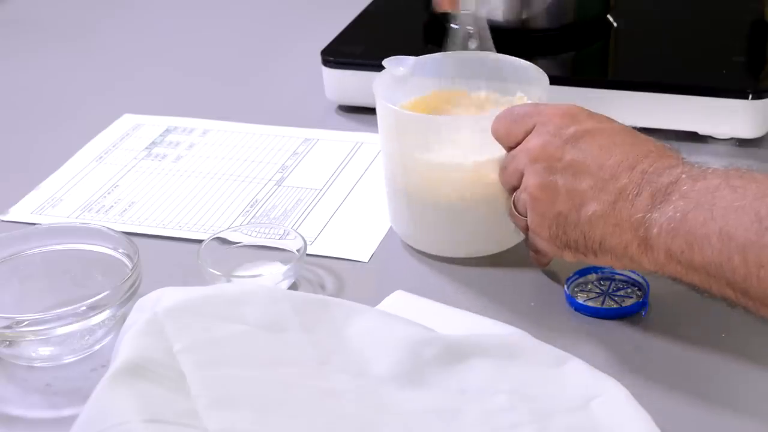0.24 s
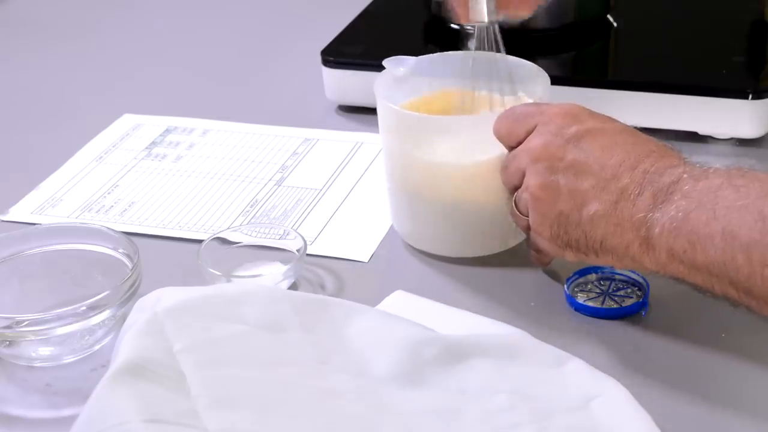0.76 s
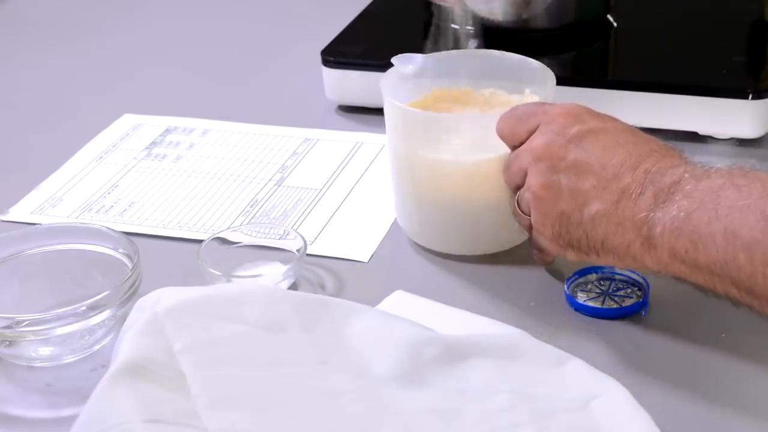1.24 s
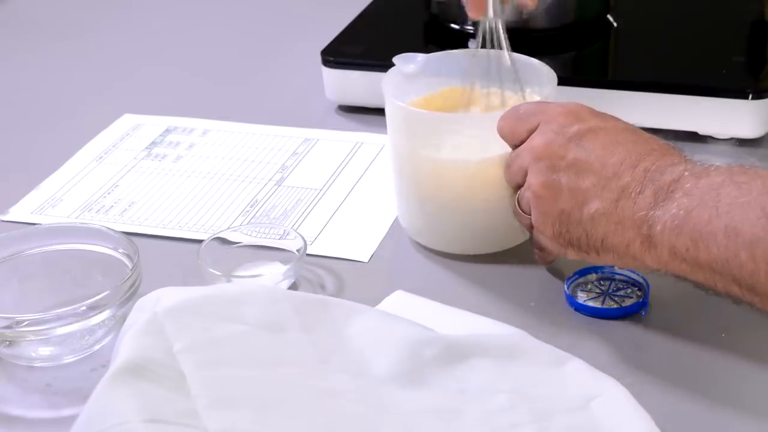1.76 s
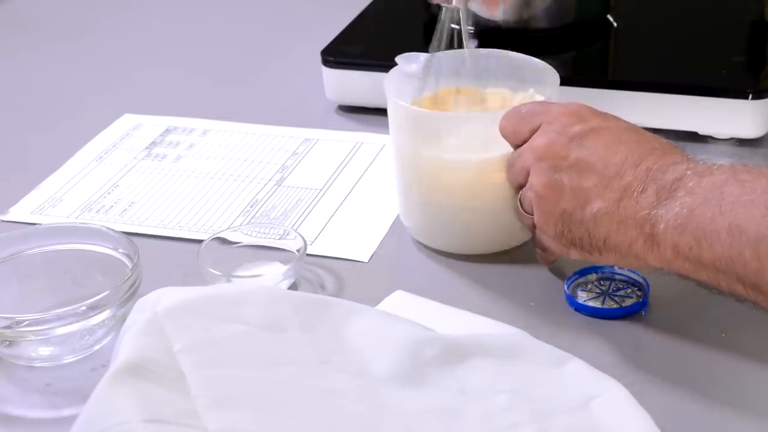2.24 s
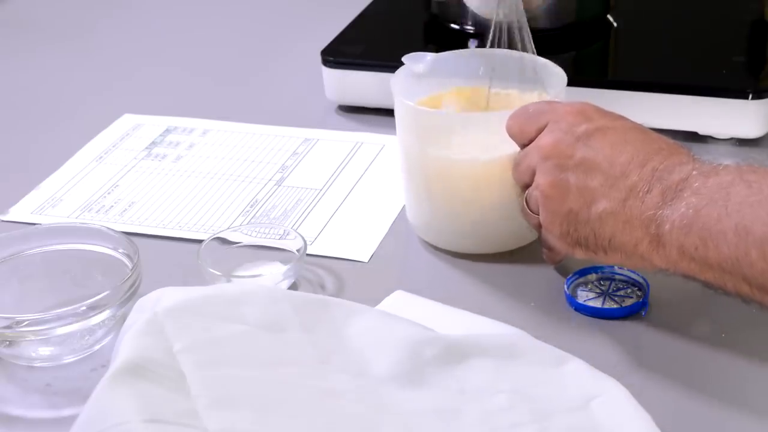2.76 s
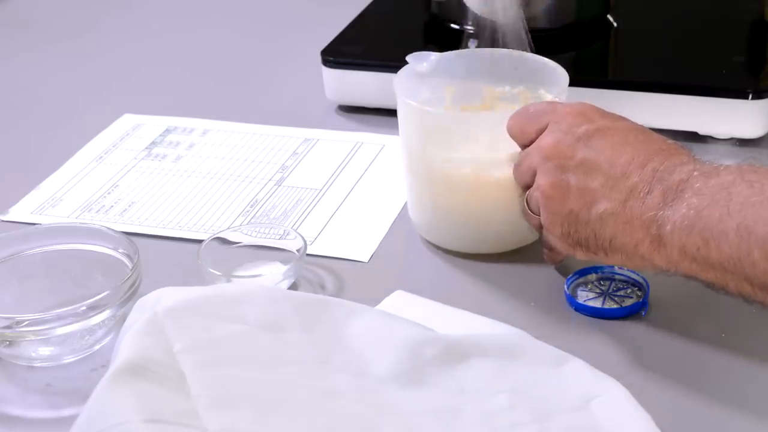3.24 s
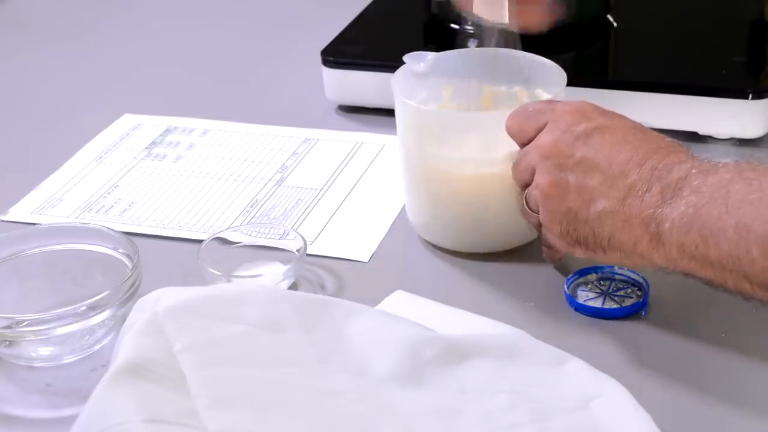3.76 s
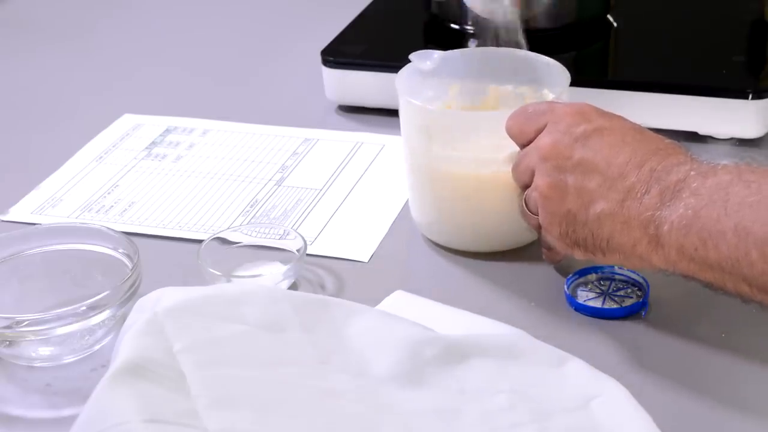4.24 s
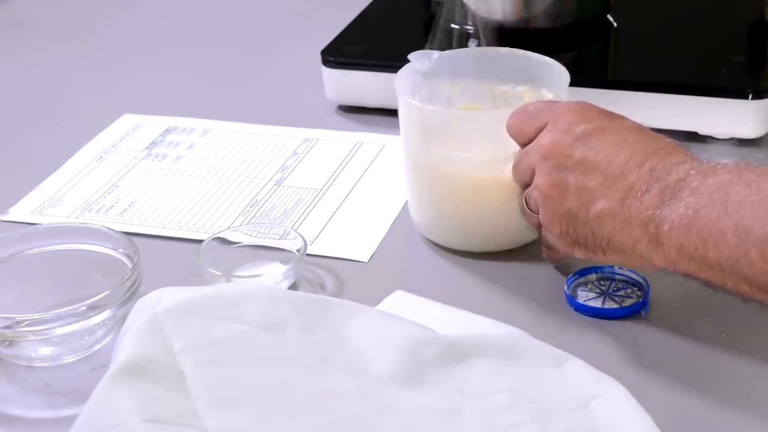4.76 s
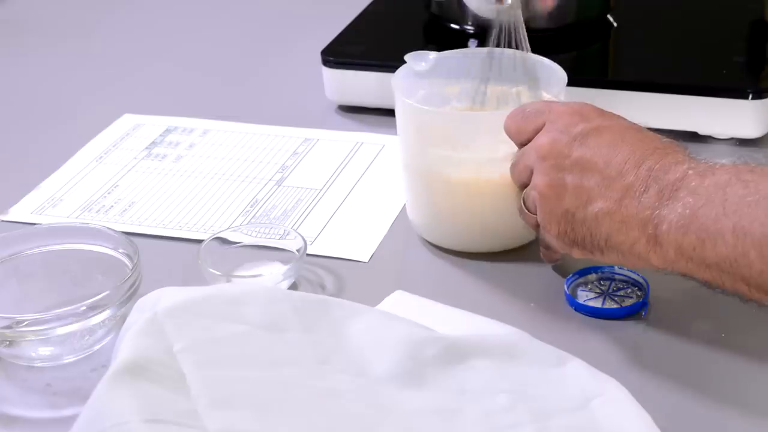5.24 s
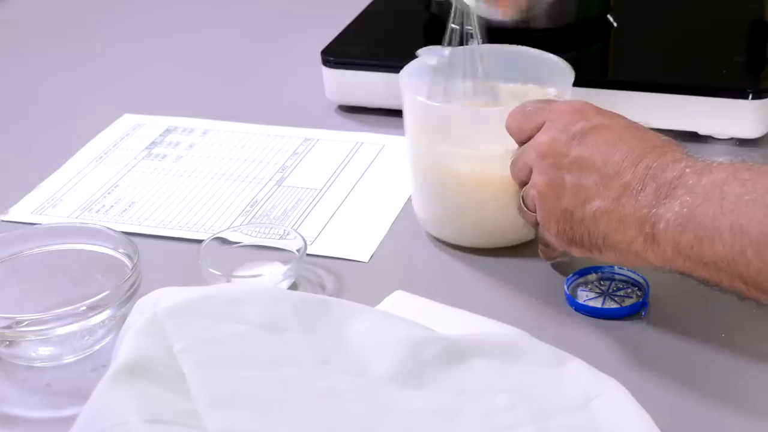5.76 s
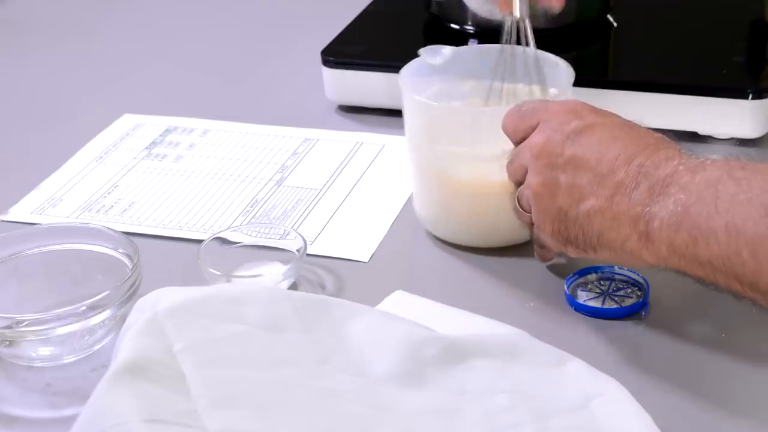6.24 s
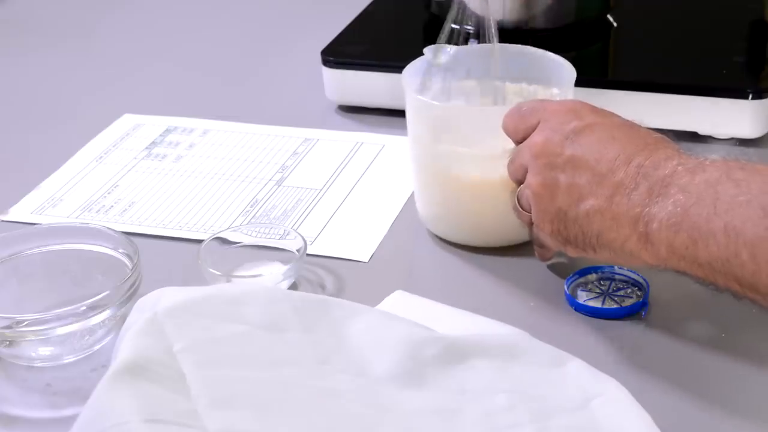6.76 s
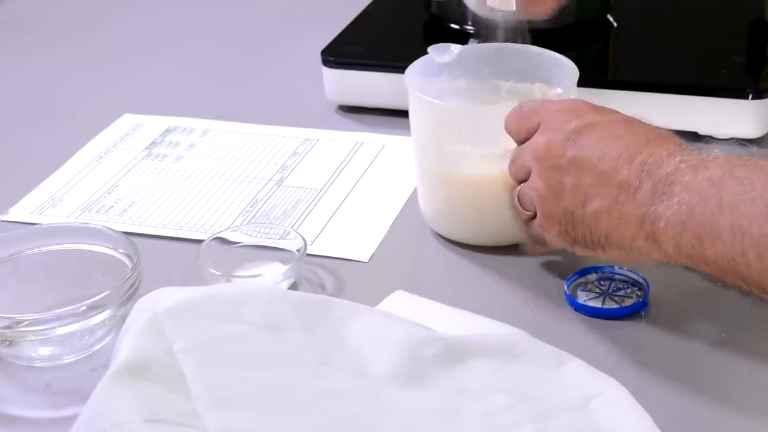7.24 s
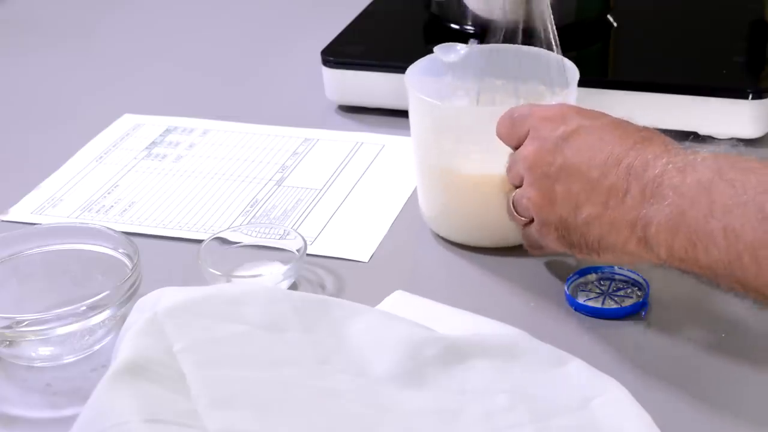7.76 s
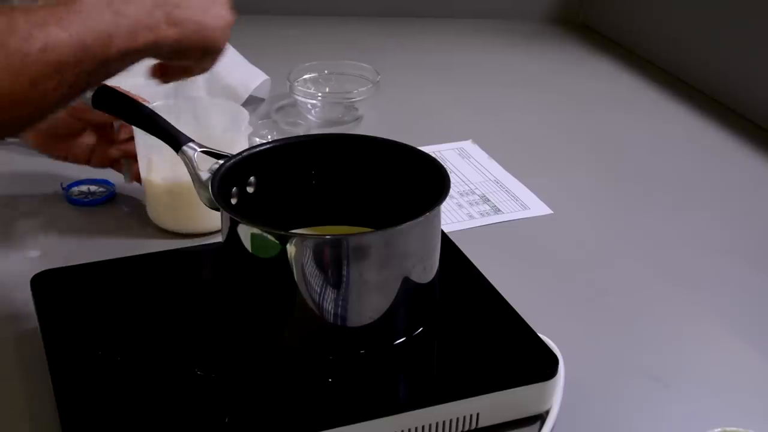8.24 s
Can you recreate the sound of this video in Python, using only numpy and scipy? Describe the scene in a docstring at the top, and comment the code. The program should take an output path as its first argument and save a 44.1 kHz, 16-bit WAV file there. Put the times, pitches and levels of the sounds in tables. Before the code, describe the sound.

A wire whisk beats batter in a plastic jug, close to the microphone, starting almost at once and running at about five strokes a second. Each stroke is an uneven cluster of bright ticks as the wires hit the wall, with a short, hollow plastic ring. Between strokes the wires scrape lightly and sometimes snap together, while the batter gives a fine wet hiss, tiny pops, occasional soft gulps and a faint low slop. Harder hits come around 2 seconds. From about 2.9 to 3.4 seconds the beating drops to a few light taps, then resumes strongly. It sounds a little duller near 4.6 seconds and brighter from 5.5, with sharper wire snaps around 6 seconds. The jug bumps softly on the counter now and then, mostly in the second half. Whisking continues until about 8.5 seconds, with a short kitchen echo and quiet room tone behind it.

```python
"""Whisking batter in a plastic jug

A kitchen counter, one microphone close to the jug; a wire whisk beats about five strokes a second.
At each contact the wires meet the wall one after another, a volley of ticks that rings the jug's modes.
In between they drag along the wall and snap together, and the batter sprays, pops, gulps and slops.
Now and then the jug knocks on the counter. Behind it all, a short kitchen echo and quiet room tone."""
import sys
import numpy as np
from scipy import signal
from scipy.fft import rfft, irfft
from scipy.io import wavfile
from scipy.ndimage import uniform_filter1d

SR = 44100
rng = np.random.default_rng(int(sys.argv[2]) if len(sys.argv) > 2 else 0)


def materialize(psi):
    """Save the field psi as 16-bit PCM at rate SR to the path in sys.argv[1].

    A 1-D psi becomes a single channel; in a 2-D psi each row is a channel.
    """
    bounded = np.clip(np.atleast_2d(psi).T, -1, 1)
    quanta = np.round(bounded * 32767).astype(np.int16)
    wavfile.write(sys.argv[1], SR, quanta)


N = 374453

# whisk on wall: (time [s], level [dB], low modes [dB], 1 kHz modes [dB], volley length [ms])
CONTACTS = [(0.17,-55,22,-20,9.8),(0.218,-34.5,5,-9,13.1),(0.239,-26,-5,-6,8.7),(0.357,-43,-11,-5,9.5),(0.404,-33.5,1,3.5,8.8),
            (0.418,-35.5,-5,-5,39),(0.465,-35.5,-1,-6,15.4),(0.487,-33,4,3,7.7),(0.535,-38,-12,7.5,11),(.609,-39,16,-14,9.4),
            (.623,-32.5,7,-9,13.7),(.676,-44,7.5,0,26),(0.697,-43.5,-9,9,12),(.724,-32.5,-27,9.5,9.9),(.798,-47,-1,0,14.6),(.822,-29.5,-0.5,-1,17.2),(0.839,-33,-16,-23,9.2),
            (.871,-38.5,2,2,18.5),(.91,-42.5,-4,3.5,27),(0.987,-43.5,5,5,13),(1.005,-30.5,7,-6,9.3),
            (1.023,-37.5,-13,-21,21),(1.061,-39.5,-1,7,15.8),(1.094,-42,-2,6,11.7),(1.131,-39,-26,7,9.4),(1.157,-42,-15,-5,10.4),(1.206,-29.5,-13,-6,10.9),
            (1.257,-38.5,-3,0,14.8),(1.293,-41,-10,7,8.9),(1.306,-36,-5,8,8),(1.407,-36.5,4,-3,7.1),(1.459,-38.5,-1,0,13.3),
            (1.548,-41.5,-5,0,11.2),(1.593,-41,10.5,-4,11.2),(1.607,-39.5,-12,-18,9.3),(1.663,-32.5,-13,0,9.6),(1.694,-38,1,1.5,28.7),
            (1.801,-24.5,1,3.5,5.7),(1.809,-26.5,-6,0.5,19.3),(1.902,-37.5,-2.5,2.5,14.3),(1.934,-41.5,-9,-5,9.9),(1.977,-25,3,-5,13.9),
            (1.992,-24,-4,-7,14),(2.037,-36.5,-1,10.5,15),(2.067,-30,-20,7,6.4),(2.122,-42.5,-15,10,9.4),(2.172,-30.5,11,-17,2.7),
            (2.18,-22.5,-2.5,-12,18.4),(2.235,-44,-11,1,21),(2.257,-35,5,-2,7),(2.268,-30.5,-9,7,7.4),(2.307,-43.5,-11,4,18),
            (2.378,-20.5,-5.5,-8,16.7),(2.425,-34.5,-6,-1,23),(2.457,-36,-7,-1,16),(2.467,-39,5,-1,14),(2.517,-38.5,-9,5,13.7),
            (2.549,-40,-11,2,5.3),(2.585,-31,4,-3,12.3),(2.636,-36,-4,1,15.8),(2.711,-42,2,-5,11.4),(2.805,-31,1,-2.5,4.5),(2.812,-31.5,-9,2,4.35),(2.853,-44.5,-6,-8,10),
            (3.02,-44,7,-1,14.8),(3.234,-39,7.5,-2,11),(3.292,-46.5,-3,6,11.6),(3.439,-23,0,-4,7.05),(3.467,-38,-17,5,6),
            (3.493,-40.5,-6,4,11.6),(3.552,-44,-11,11,10.5),(3.601,-47.5,1,8,5.4),(3.635,-21,-3,-5.5,8.6),(3.675,-35.5,-12,-4,20.4),
            (3.714,-35.5,-10,12,11.7),(3.761,-41.5,-9,6,12),(3.82,-38.5,23,5,7.8),(3.829,-25.5,-11,-13,15.3),(3.841,-27,-29,7,11),(3.882,-34.5,-9,-5,14),
            (3.915,-34.5,-8,5,20.7),(3.959,-35,-36,15.5,8.5),(4.024,-22.5,0.5,-8,10.2),(4.035,-25,-11,-4,7.1),(4.078,-31,-8,3,6.3),
            (4.117,-40.5,-26,12,18),(4.162,-38,-25,16.5,9.3),(4.228,-27,-3.5,-3,15),(4.278,-41,4,-4,17),(4.316,-41,-2,8,14),
            (4.432,-28,2.5,-5,17.4),(4.48,-36.5,-1,-6,5.8),(4.497,-39.5,-6,-4,11),(4.646,-26.5,-0.5,-2.5,10.1),(4.687,-39,-21,-11,7.3),(4.869,-25.5,-1,-4,6.8),
            (4.878,-30.5,1,5.5,8.8),(4.979,-38.5,10,-1,21.2),(5.068,-31,-5,4,11.2),(5.123,-42.5,7.5,5,28),(5.151,-38,-6,5,8.7),
            (5.21,-41,-5,3,8.7),(5.278,-31,0,2,10.2),(5.312,-33.5,-17,2,20),(5.345,-38,4,-4,10.5),(5.355,-41.5,-22,12.5,9),(5.414,-36.5,2,3.5,18),
            (5.471,-33.5,-0.5,-3,13.8),(5.502,-33.5,-7,3.5,12.7),(5.529,-39,2,6.5,9.8),(5.548,-37.5,-22,12,10.6),(5.613,-34,-25,10.5,25),
            (5.671,-31,0,7,14.9),(5.704,-36,7.5,-5,20),(5.752,-38,-12,14.5,21.5),(5.805,-38,-13,10,15),(5.823,-42.5,-9,17,11.2),
            (5.86,-27,-0.5,-4,16),(5.915,-37,-1,8,12.2),(5.953,-37,-23,16,16),(6,-37,1,7,8.7),(6.063,-23.5,-4,-4,11.5),
            (6.113,-30.5,-1,-2,9.7),(6.136,-40.5,-3,13.5,12.8),(6.15,-31,-31,14,12),(6.196,-35,-1,6,12),(6.262,-27.5,2,-3.5,18.5),
            (6.352,-35,-8,11,9.6),(6.382,-39,-8,9,7),(6.403,-35,2,7.5,9.2),(6.472,-24.5,0,-11,16.9),(6.527,-35,-8,-4,10),
            (6.566,-30.5,-9,1.5,17.2),(6.612,-33.5,0,-4,11.2),(6.68,-24.5,-5,1.5,7.5),(6.688,-26.5,-6,-19,6.7),(6.718,-36.5,-6,-2,43),
            (6.769,-39.5,6,2,15),(6.815,-38.5,0,-1,13),(6.872,-31.5,-1,-16,7.8),(6.878,-25,2,6.5,4.5),(6.884,-32,3.5,2,9.3),(6.974,-37,2,4,18.2),(7.024,-42.5,4,3,14.6),
            (7.096,-22.5,2,8,4.93),(7.102,-34,4,4,11.2),(7.149,-39.5,-7,-7,10),(7.174,-41.5,-1,9,7.3),(7.242,-42.5,-6,7,14),(7.302,-43,4.5,10,8.3),(7.31,-35.5,3.5,9,13.4),
            (7.343,-41.5,-8,15,4.5),(7.353,-38,1,7,12),(7.391,-39.5,-2,6,12),(7.452,-38.5,6.5,6.5,9.5),(7.517,-46.5,13.5,-4,21),(7.63,-36,7.5,11.5,12.2),(7.666,-43,11,-5,21),
            (7.732,-43,10,4.5,32.3),(7.857,-44,14,6,19.5),(7.91,-34.5,0,5,11.6),(7.975,-44,-5,-11,6.6),(7.986,-26.5,-0.5,4.5,4.8),(7.994,-33,-1,9.5,10.4),
            (8.05,-44.5,-10,-5,12.2),(8.232,-36.5,5,8,14.1),(8.279,-45.5,0,7,22.7),(8.382,-39.5,2,7.5,19.7),(8.45,-25,4.5,-1,3.87),(8.458,-31.5,0,5,8.3)]
# resonances of jug and wires: (frequency [Hz], level [dB], t60 [s])
JUG_MODES = [(348.5, -37.5, 0.061), (425.6, -38, 0.08), (517, -49, 0.14), (639.7, -36, 0.039),
             (782.6, -34.5, 0.036), (930.6, -27.5, 0.045), (1068.5, -29, 0.044), (1236, -33.5, 0.052),
             (1322, -29, 0.018), (1688, -46, 0.18), (1949, -24.5, 0.019), (2171, -26.5, 0.038),
             (2234, -35.5, 0.077), (2497, -31, 0.025), (2965, -20.5, 0.009), (2790, -21.5, 0.0088),
             (3170, -27.5, 0.027), (3375, -22.5, 0.018), (3700, -19.5, 0.005), (4300, -23, 0.0024),
             (4395, -22, 0.014), (4710, -21, 0.0083), (5340, -17, 0.0061), (6610, -28, 0.013),
             (7980, -28.5, 0.0088), (9330, -30, 0.0054)]
# anchors of the low, 1 kHz, middle (two ends) and high modes: (frequency [Hz])
ZONES_HZ = [600, 1305, 2340, 2970, 3740]
# strength of the contacts' high modes and ticks: (time [s], level [dB])
BRIGHTNESS = [(0, 0.5), (1.5, -1.5), (2.4, -2.5), (3, -4), (4, -3.5), (4.6, -8), (5.5, 0), (6.5, -2),
              (7.3, 0.5), (8.49, 3.5)]
# tick of wire on plastic: (frequency [Hz], level [dB])
TICK_SPECTRUM = [(300, -48), (1500, -16), (3500, -6), (6000, -2.5), (9000, -4), (16500, -19.5)]
# wires dragging and air pockets popping: (time [s], level [dB])
STIR_LEVEL = [(0.0, -103), (0.23, -54.5), (0.42, -54), (1.04, -51.5), (1.61, -57.5), (1.89, -52),
              (2.43, -55.5), (2.98, -62), (3.26, -61.5), (3.9, -52), (4.73, -62), (5.7, -53), (6.29, -53.5),
              (7.76, -57.5), (8.49, -60)]
# wire against wire: (time [s], level [dB])
WIRE_SNAPS = [(0.4645, -23), (0.5345, -29.5), (0.592, -31), (0.798, -42), (1.1802, -30), (1.461, -23.5),
              (1.525, -37), (2.235, -23), (2.961, -35.5), (3.292, -25), (3.8812, -25), (3.897, -23),
              (4.117, -31), (4.28, -27), (4.302, -33), (4.357, -36), (5.4214, -26), (5.504, -17),
              (5.916, -18.5), (5.938, -30), (6.112, -16), (6.3165, -24), (6.34, -29), (6.9504, -32.5),
              (7.0068, -35), (7.118, -28), (7.1507, -28.5), (7.7047, -31), (8.2851, -36)]
# air gulped by the batter: (time [s], level [dB], pitch [Hz])
GLUGS = [(0.633, -40, 343), (1.002, -34, 601), (1.024, -39, 330), (1.205, -40, 440), (1.985, -37.5, 357),
         (3.023, -46.5, 407), (3.236, -41, 418), (3.83, -35, 600), (3.845, -47, 362), (4.03, -39, 351),
         (5.149, -39.5, 502), (5.717, -35, 332), (5.862, -38, 630), (5.954, -30, 1302), (6.148, -33, 1280),
         (7.456, -35.5, 920)]
# jug on counter: (time [s], level [dB], pitch [Hz])
KNOCKS = [(1.99, -48, 241), (3.823, -51, 232), (4.02, -55, 149), (4.872, -47, 245), (4.988, -51, 174),
          (5.151, -52, 163), (5.427, -46, 260), (7.091, -43.5, 260), (7.642, -50, 242), (7.89, -48, 176)]
# batter slopping: (time [s], level [dB])
SLOP_LEVEL = [(0, -65.5), (4.3, -65), (5, -63.5), (8.49, -59)]
# decay of the kitchen's echo: (frequency [Hz], t60 [s])
KITCHEN_DECAY = [(700, 0.57), (4000, 0.16), (12000, 0.11)]
# room tone: (frequency [Hz], level [dB])
ROOM_SPECTRUM = [(20, -16), (130, -13.5), (500, -7), (2500, -18), (16500, -33)]


def whisk_contacts(wires=10, chatters=8, square_ms=9.1, lead_in=0.27, wire_scatter_db=1.83):
    """Each contact is a volley: wires land one by one, each chattering briefly; the last trail off."""
    start_s, level_db, low_db, khz_db, volley_ms = np.transpose(CONTACTS)[:, :, None]
    high_db = np.interp(start_s, *np.transpose(BRIGHTNESS))
    volleys, length = len(CONTACTS), volley_ms * SR / 1000
    lands = (np.arange(wires) + rng.random((volleys, wires))) / (wires - 3)   # in volley lengths
    lands[:, 0] = 0
    lands += 4.5 * np.maximum(lands - 1, 0)   # three stragglers rattle on after the volley
    late = np.repeat(lands, chatters, axis=1) + .12 * rng.random((volleys, wires * chatters)) ** 2
    at = (start_s * SR + late * length).astype(int)
    force_db = wire_scatter_db * np.repeat(rng.standard_normal((volleys, wires)), chatters, axis=1)
    chatter = np.clip(rng.standard_normal(late.shape), -2, 2)
    # short volleys land at full force; longer, glancing ones swell
    swell = np.minimum(square_ms / volley_ms + late / lead_in / 2, 1)
    fade = from_db(np.maximum(-7 * late ** 2, -27))
    sizes = swell * fade * from_db(force_db) * chatter
    # the energy of a volley is its power times its length
    sizes *= from_db(level_db) * np.sqrt(length / np.sum(sizes ** 2, axis=1, keepdims=True))
    scatter = np.clip(rng.standard_normal((volleys, 1, len(JUG_MODES))), -2, 1)
    signs = rng.choice([-1, 1], late.shape + (len(JUG_MODES),))
    bends = rng.integers(-2, 3, scatter.shape)
    body = jug(at, sizes, (low_db, khz_db, high_db), scatter, signs, bends)
    return body + wire_ticks(at, sizes * from_db(high_db) * (late < 1.3))


def jug(at, sizes, zone_db, scatter, signs, bends, scatter_db=3.5, load_bend=0.019, build_up_s=0.00786):
    """Ticks ring every mode of the jug; each contact point favours other modes, pushed in or out."""
    out = np.zeros(N)
    for k, (hz, mode_db, t60) in enumerate(JUG_MODES):
        # weights of the low, 1 kHz and high zones
        weights = [np.interp(np.log(hz), np.log(ZONES_HZ), row) for row in np.eye(5)[[0, 1, 4]]]
        tilt_db = sum(weight * db for weight, db in zip(weights, zone_db))
        gain = sizes * signs[..., k] * from_db(mode_db + tilt_db + scatter_db * scatter[..., k])
        # slow bending waves set the lowest mode going late, higher ones much sooner
        lag = int(build_up_s * SR * (JUG_MODES[0][0] / hz) ** 2)
        for bend in range(-2, 3):   # the batter's load bends the pitch up to two steps either way
            clicks = sum_at(at + lag, gain * (bends[..., k] == bend))
            out += ring(clicks, hz * (1 + load_bend * bend), t60)
    return out


def wire_ticks(at, sizes, split_hz=6500, tilt_db=5):
    """The bare tick of wire on plastic before any mode builds up, brighter or duller at each contact."""
    tilt = from_db(tilt_db * rng.standard_normal((len(at), 1)))
    lows = butter(sum_at(at, sizes) + 1e-18, split_hz, "low")
    highs = butter(sum_at(at, sizes * tilt) + 1e-18, split_hz, "high")
    return colour(lows + highs, TICK_SPECTRUM)


def wire_drag(catches_per_s=2500):
    """Dense, uneven little catches of the wires on the wall ring the same modes."""
    at = np.flatnonzero(rng.random(N) < catches_per_s / SR)
    sizes = from_db(3 * np.minimum(rng.exponential(1, N), 5))[at]
    patch, modes = at // 512, len(JUG_MODES)   # mode balance and pitch hold for about 12 ms
    scatter = rng.standard_normal((2048, modes))[patch]
    signs = rng.choice([-1, 1], (4096, modes))[at % 4096]
    bends = rng.integers(-2, 3, (2048, modes))[patch]
    return rms_one(jug(at, sizes, zone_db=(9, -5, 0), scatter=scatter, signs=signs, bends=bends))


def wire_snaps(crack_t60_s=0.007, tail_t60_s=0.069, above_hz=570):
    """Wires snap against each other: a bright burst that cracks at once, then dies fast."""
    out, t = np.zeros(N), np.arange(SR // 16) / SR
    decay = from_db(-60 * t / crack_t60_s) + from_db(-60 * t / tail_t60_s) / 3
    for start_s, level_db in WIRE_SNAPS:
        start = int(start_s * SR)
        out[start:start + len(t)] += from_db(level_db) * decay * rng.standard_normal(len(t))
    return colour(butter(out, above_hz, "high"), TICK_SPECTRUM)


def batter_spray(contact, t60_s=0.091, above_hz=2300, shimmer_db=-22):
    """Batter sprays through the wires after each contact: a fluttering hiss with a thin wire shimmer."""
    keep = from_db(-120 / (t60_s * SR))
    envelope = np.sqrt(signal.lfilter([1 - keep], [1, -keep], contact ** 2))
    flutter = from_db(3 * rms_one(uniform_filter1d(rng.standard_normal(N), size=400)))
    noise = rng.standard_normal(N)
    hiss = rms_one(colour(butter(noise, above_hz, "high"), TICK_SPECTRUM))
    shimmer = from_db(shimmer_db) * rms_one(ring(noise, hz=12610, t60=0.03))
    return envelope * flutter * (hiss + shimmer)


def batter_pops(pops_per_s=1500, lowest_hz=1800, cycles=0.76, tilt_db=-9, spread=0.32):
    """Small air pockets burst in clumps, each clump near a pitch of its own, fainter on top."""
    clump = 400   # samples
    density = np.repeat(rng.exponential(1, N // clump + 1), clump)[:N]
    at = np.flatnonzero(rng.random(N) < density * pops_per_s / SR)
    own_pitch, faintness = rng.random((2, N))[:, at, None]
    clump_pitch = rng.random(N // clump + 1)[at // clump, None]
    pitch = spread * own_pitch + (1 - spread) * clump_pitch
    hz = lowest_hz * 8 ** pitch   # within three octaves
    t = np.arange(256) / SR
    age = t * hz / cycles
    tones = from_db(tilt_db * pitch - 20 * faintness - 10 * age) * np.sin(2 * np.pi * hz * t)
    return rms_one(sum_at(at[:, None] + np.arange(len(t)), tones))


def glugs_and_knocks(glug_crest_s=0.0075, knock_crest_s=0.0076, rise_per_s=1.3):
    """Batter gulps air and the jug knocks on the counter: soft tones that swell, climb a little and die."""
    out, t = np.zeros(N), np.arange(SR // 8) / SR
    for events, crest_s in ((GLUGS, glug_crest_s), (KNOCKS, knock_crest_s)):
        swell = t / crest_s * np.exp(1 - t / crest_s)
        for start_s, level_db, hz in events:
            start = int(start_s * SR)
            tone = np.sin(2 * np.pi * hz * t * (1 + rise_per_s * t / 2))
            out[start:start + len(t)] += from_db(level_db) * swell * tone
    return out


def batter_slop(band_hz=(95, 240)):
    """Low lumpy noise of thick batter thrown about."""
    return from_db(in_time(SLOP_LEVEL)) * rms_one(butter(rng.standard_normal(N), band_hz, "band"))


def kitchen_echo(source, count=8, hold_samples=2000, onset_s=0.0027):
    """Diffuse tails, each octave dying at its own rate; they take turns as the contact point wanders."""
    t, tails = np.arange(SR // 2) / SR, 0
    for hz in 177 * 2. ** np.arange(7):
        octave = butter(rng.standard_normal((count, len(t))), [hz / np.sqrt(2), hz * np.sqrt(2)], "band")
        tails = tails + octave * from_db(-60 * t / at_hz(KITCHEN_DECAY, hz))
    tails *= np.clip(t / onset_s, 0, 1)
    tails /= np.sqrt(np.sum(tails ** 2, axis=1, keepdims=True))
    turn = np.arange(N) // hold_samples % count == np.arange(count)[:, None]
    shares = uniform_filter1d(turn * 1., size=hold_samples // 4, axis=1)
    return signal.fftconvolve(source * shares, tails, axes=1).sum(axis=0)[:N]


def room_tone(air_db=-64, rumble_db=-71.5, rumble_hz=(36.5, 73)):
    """The quiet kitchen behind the jug: a soft hiss over a deep, wavering hum."""
    air = rms_one(colour(rng.standard_normal(N), ROOM_SPECTRUM))
    rumble = rms_one(butter(rng.standard_normal(N), rumble_hz, "band"))
    return from_db(air_db) * air + from_db(rumble_db) * rumble


def from_db(db):
    """Decibels to gain."""
    return 10 ** (np.asarray(db) / 20)


def rms_one(x):
    """Scale to rms 1."""
    return x / np.sqrt(np.mean(x ** 2) + 1e-20)


def in_time(rows):
    """A (time [s], value) curve at every sample."""
    return np.interp(np.arange(N) / SR, *np.transpose(rows))


def at_hz(rows, hz):
    """A (frequency [Hz], value) table read on a log-frequency axis."""
    table_hz, values = np.transpose(rows)
    return np.interp(np.log(hz), np.log(table_hz), values)


def sum_at(at, values):
    """Add values into a silent track at the given sample indices."""
    return np.bincount(at.ravel(), values.ravel(), N)[:N]


def butter(x, hz, kind, order=2):
    """Low-, high- or band-pass filter."""
    return signal.sosfilt(signal.butter(order, hz, kind, fs=SR, output="sos"), x)


def ring(clicks, hz, t60):
    """A unit click sets a sine of height 1 ringing."""
    r, w = from_db(-60 / (t60 * SR)), 2 * np.pi * hz / SR
    return signal.lfilter([0, np.sin(w)], [1, -2 * r * np.cos(w), r * r], clicks + 1e-18)


def colour(x, spectrum):
    """Causal (minimum-phase) filter with the given spectrum."""
    hz = np.maximum(np.arange(2049) * SR / 4096, 1)
    cepstrum = irfft(at_hz(spectrum, hz) * np.log(10) / 20)
    cepstrum[1:2048] *= 2
    cepstrum[2049:] = 0
    return signal.fftconvolve(x, irfft(np.exp(rfft(cepstrum))))[:len(x)]


def scene(pops_db=5, spray_db=-24.5, echo_db=-12.5):
    """At the microphone, in mono: whisk, jug and batter up close, the kitchen well behind."""
    stirring = from_db(in_time(STIR_LEVEL)) * (wire_drag() + from_db(pops_db) * batter_pops())
    # the jug is too small to push out bass
    whisk = butter(whisk_contacts() + stirring, hz=276, kind="high", order=4)
    close = whisk + from_db(spray_db) * batter_spray(whisk) + glugs_and_knocks() + wire_snaps()
    background = room_tone()
    return (close + from_db(echo_db) * kitchen_echo(close) + batter_slop() + background)[None]


def record(dry, overload=0.24, cutoff_hz=16300):
    """The recorder rounds the peaks and cuts the top."""
    rounded = overload * np.tanh(dry / overload)
    return signal.sosfilt(signal.cheby2(20, 60, cutoff_hz, fs=SR, output="sos"), rounded)


dry = scene()
out = record(dry)
materialize(out)
```